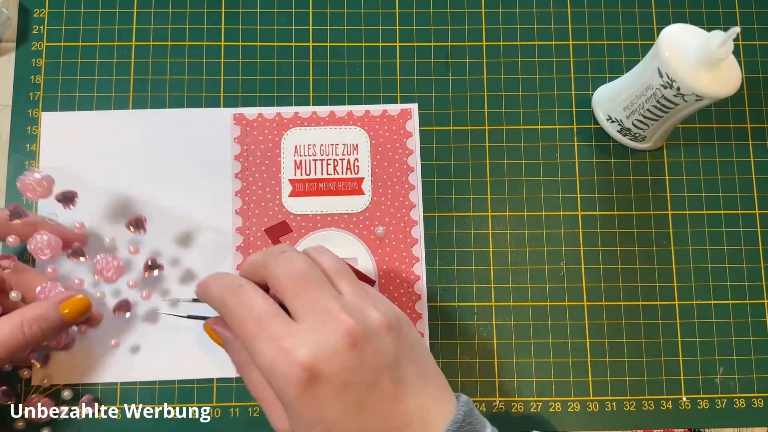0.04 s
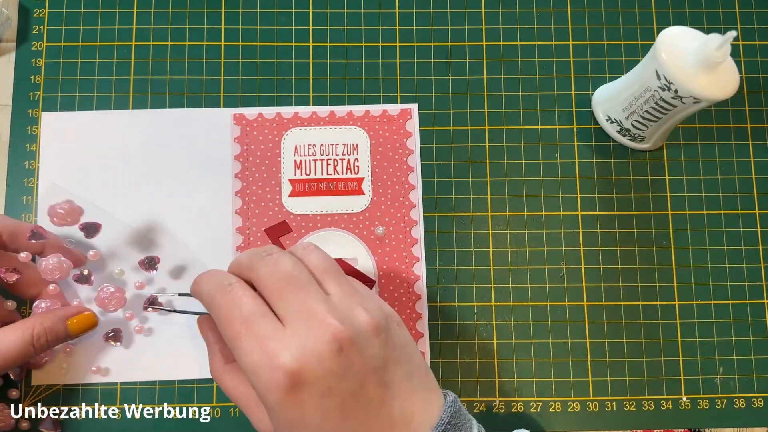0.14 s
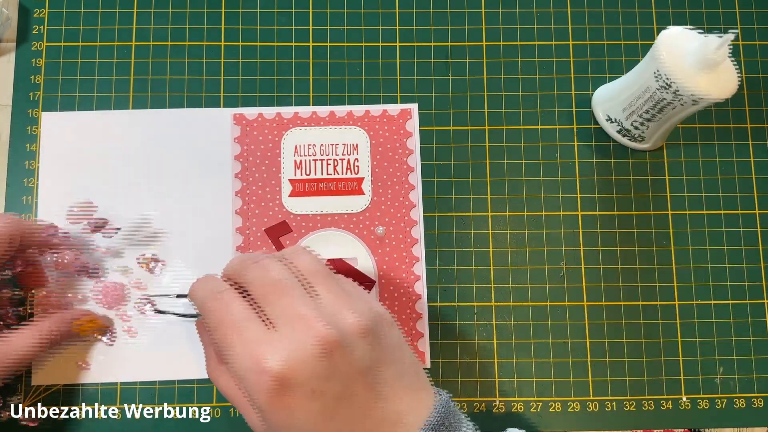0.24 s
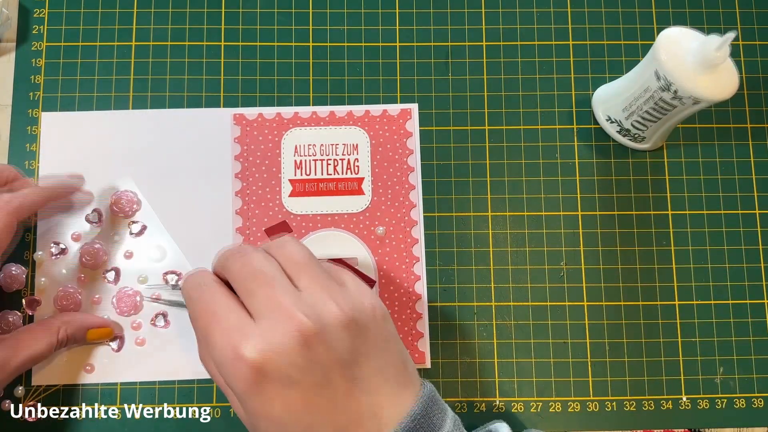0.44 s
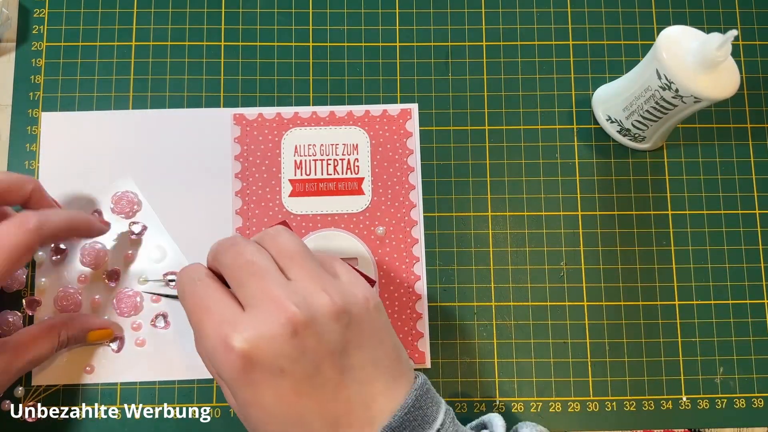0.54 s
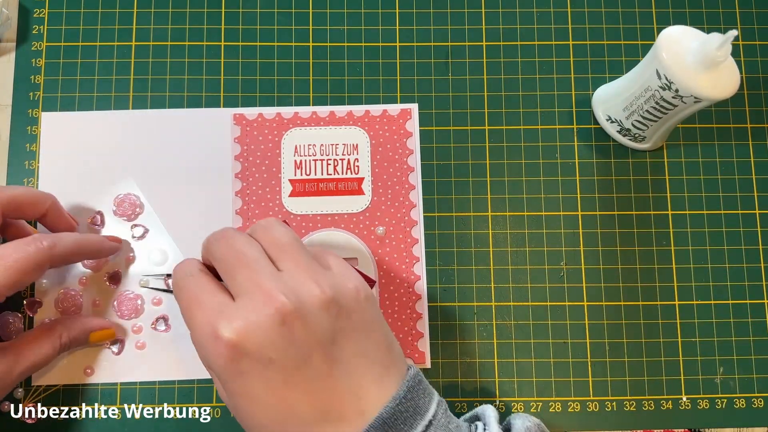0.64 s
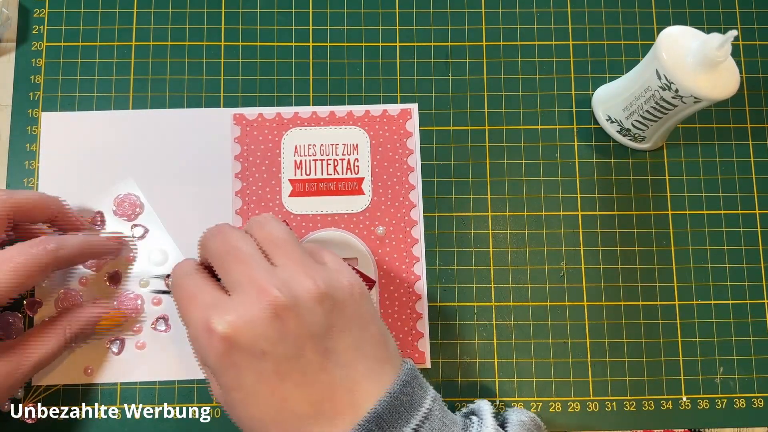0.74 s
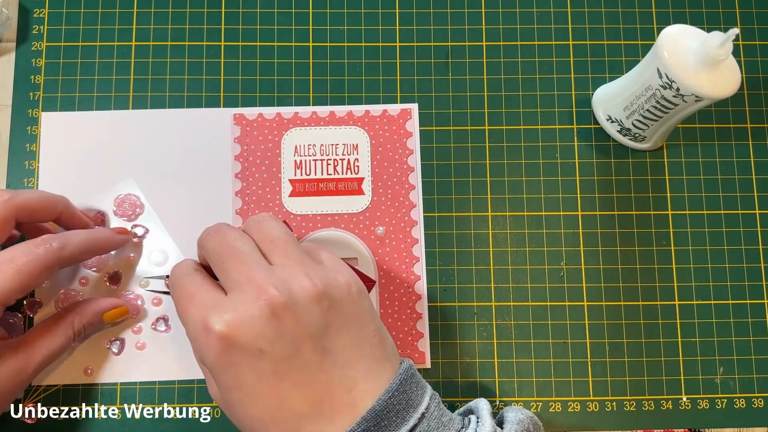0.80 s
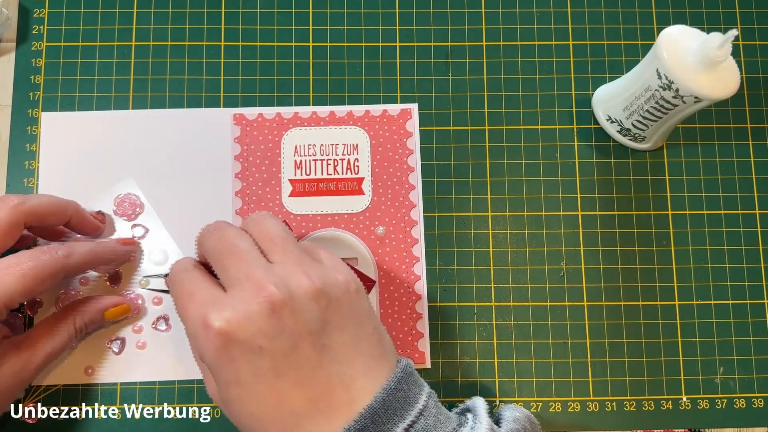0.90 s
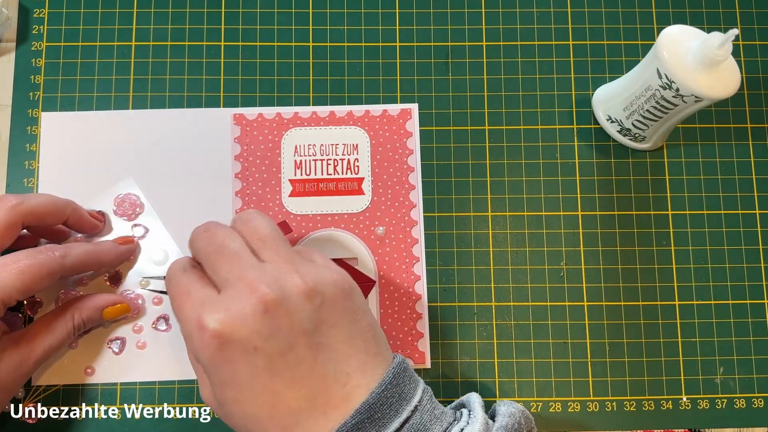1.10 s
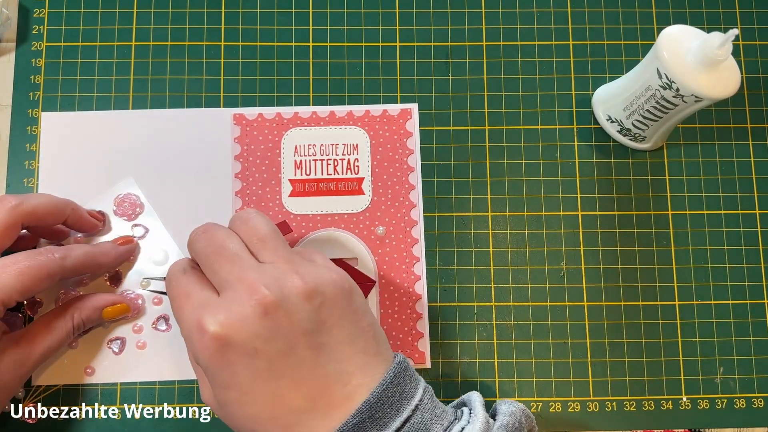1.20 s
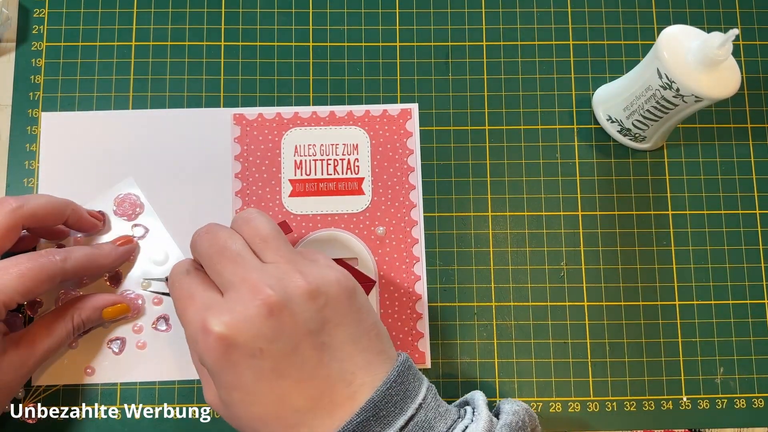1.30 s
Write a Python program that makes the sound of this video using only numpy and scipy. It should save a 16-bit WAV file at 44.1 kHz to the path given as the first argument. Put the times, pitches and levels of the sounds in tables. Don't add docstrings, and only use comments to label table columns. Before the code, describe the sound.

A stiff plastic sheet of stick-on gems rustles briefly, snaps with a hollow pop against a table, bounces, then crackles sharply as it is pressed flat; faint touches follow in a small quiet room, closely miked.

```python
import sys
import numpy as np
from scipy import signal
from scipy.fft import rfft, irfft, next_fast_len
from scipy.io import wavfile
from scipy.ndimage import map_coordinates

SR = 44100
rng = np.random.default_rng(int(sys.argv[2]) if len(sys.argv) > 2 else 0)


def persist_wave(psi):
    counts = np.round(np.clip(psi, -1, 1) * 32767).astype(np.int16)
    wavfile.write(sys.argv[1], SR, np.atleast_2d(counts).T)


def volts_from_decibels(level):
    exponent = np.asarray(level, float) / 20
    return 10 ** exponent


N = 59535
T = np.arange(N) / SR


def unit(x):
    return x / np.sqrt(np.mean(x ** 2) + 1e-20)


def along(points, hz):
    f, v = np.transpose(points)
    return np.interp(np.log(hz + 1), np.log(f + 1), v)


def filtered(x, response):
    m = next_fast_len(N + 8192)
    return irfft(rfft(x, m) * response(np.fft.rfftfreq(m, 1 / SR)), m)[..., :N]


def wobble(rate_hz):
    return map_coordinates(rng.standard_normal(int(N * rate_hz / SR) + 4), [T * rate_hz])


def noise(spectrum, grain_db=0):
    grain_level_db = grain_db * np.minimum(rng.exponential(size=N), 4)
    grains = rng.standard_normal(N) * volts_from_decibels(grain_level_db)
    return unit(filtered(grains, lambda hz: volts_from_decibels(along(spectrum, hz))))


def tone(hz):
    wander_rad = 0.55 * wobble(min(600, hz / 8))
    return np.sqrt(2) * np.sin(2 * np.pi * (hz * T + rng.random()) + wander_rad)


def bump(s, rise_s, fall_s):
    return np.exp(np.minimum((T - s) / abs(rise_s), (s - T) / abs(fall_s)))


def burst(shape, x):
    return shape * x * np.linalg.norm(shape) / np.linalg.norm(shape * x)


def rings(peaks):
    def response(f):
        total = 0
        for k, (hz, width_hz, db) in enumerate(peaks):
            damping = 1j * f * width_hz
            total = total + (-1) ** k * volts_from_decibels(db) * damping / (hz * hz - f * f + damping + 1e-9)
        return total
    return response


# (frequency [Hz], level [dB], lag [s])
BUCKLE_MODES = [(1160, -11.5, .002), (1542.8, 0.5, .001), (1880, 4.5, 0), (2250, -1, -.0017),
                (2919, -9.5, -.0005), (4100, -7.5, .0008), (5175, -9.5, -.001), (6210, -16, 0)]


def buckle():
    pop_s, swell_s, hold_s, stop_s = 0.2562, 0.0012, 0.0028, 0.0012
    modes = 0
    for hz, db, lag_s in BUCKLE_MODES:
        t = T - pop_s - lag_s
        shape = np.exp(np.minimum(0, np.minimum(t / swell_s, (hold_s - t) / stop_s)))
        modes = modes + volts_from_decibels(db - 3) * shape * tone(hz)
    crack = burst(bump(pop_s, 0.0009, 0.0025), noise(RUB_SPECTRUM, grain_db=5.0))
    return volts_from_decibels(-10.5) * modes + volts_from_decibels(-13) * crack


def patch_pop(s, db, hz, rise_s, fall_s, crack_db):
    shape = bump(s, rise_s, fall_s)
    crack = burst(shape, noise(RUB_SPECTRUM, grain_db=-0.5))
    return volts_from_decibels(db) * (shape * tone(hz) + volts_from_decibels(crack_db) * crack)


# (time [s], level [dB], pitch [Hz], rise [s], fall [s per 9 dB])
SNAPS = [(0.2354, -18.5, 3750, .0003, 0.0035), (0.2365, -18, 1600, .0005, 0.0024),
         (0.238, -20.5, 2600, .0006, 0.0018), (.24, -21.5, 2300, .0008, 0.0001),
         (.2385, -30, 4750, .001, 0.0077), (.245, -28, 2000, .001, -0.0009),
         (.249, -29, 1999, .0015, 0.0009), (.2635, -22, 2100, .001, -0.0008),
         (.268, -23.5, 1500, .002, 0.0057), (0.2722, -25, 2298, .001, -0.001),
         (.276, -26, 2399, .001, 0.001), (0.284, -27, 1890, .001, -0.0017),
         (.3026, -21, 3150, 0.00055, 0.0015), (0.3026, -23.5, 1644, .0006, .001),
         (.306, -24.5, 2182, .002, 0.0016), (0.3074, -23.5, 3111, .0008, .001),
         (.311, -26, 1950, .0015, 0.0027), (.319, -32.5, 3295, .002, 0.0005),
         (.397, -28.5, 1604, .001, 0.0035), (.424, -31, 2250, 0.0017, -0.0038),
         (.077, -26.5, 2200, .001, -0.0009), (.0778, -34.5, 3420, 0.00056, -0.0073),
         (.0765, -38.5, 1290, 0.0013, 0.0029)]


def snaps():
    return sum(patch_pop(*row, crack_db=-3.5) for row in SNAPS)


# (time [s], level [dB], pitch [Hz], broad crack [dB])
CLICKS = [(0.071, -33, 2189, -19), (0.16, -39.5, 2320, -17.5), (0.1721, -30, 5726, 2),
          (0.2328, -27.5, 5000, -3), (0.2344, -23, 6235, 3), (0.3011, -30.5, 6000, -0.5),
          (.374, -32.5, 6040, -0.5), (.3785, -40.5, 4500, -7), (0.3878, -36, 4500, -4),
          (.39, -34, 2821, -7), (.397, -30, 7470, 0.5), (0.4007, -22, 6800, 0), (0.4016, -16.5, 5784, -6),
          (0.4043, -15.5, 5037, -3.5), (0.4063, -14.5, 4416, -3.5), (.4067, -18, 1296, 0.5),
          (.408, -20, 5998, -4), (0.41, -16.5, 5004, -4), (0.4164, -31.5, 5488, -6),
          (.766, -61, 5590, -10.5), (.809, -52.5, 5460, -9)]


def clicks():
    rise_s, fall_s = 0.00033, 0.00077
    return sum(patch_pop(s, db, hz, rise_s, fall_s, crack_db) for s, db, hz, crack_db in CLICKS)


# (frequency [Hz], level [dB])
SHEET_MODES = [(1220, -4.5), (1570, -6.5), (2270, 0.5), (3180, -3), (4080, -1.5), (4430, -0.5),
               (5000, -2.5), (5660, 0), (6550, -5), (7070, -3.5)]
# (frequency [Hz], density [dB per Hz])
CRUNCH_SPECTRUM = [(180, -32), (400, -14), (900, -12), (2200, -7.5), (3500, -8), (5500, -3.5), (8000, -2),
                   (11000, -12), (16000, -12)]


def crunch():
    shape = bump(0.4052, 0.003, 0.0045)
    cracks = burst(shape, volts_from_decibels(8.3 * wobble(600)) * noise(CRUNCH_SPECTRUM, grain_db=4))
    modes = sum(volts_from_decibels(db + 2.5 * wobble(300)) * tone(hz) for hz, db in SHEET_MODES)
    return volts_from_decibels(-15.5) * cracks + volts_from_decibels(-23.5) * shape * modes


# (time [s], level [dB], frequency [Hz])
THUDS = [(.01, -38.5, 513.6), (.242, -38, 170.1), (.256, -25.5, 427.5), (.257, -31, 700),
         (0.26, -29.5, 320), (.261, -26.5, 235), (0.274, -30, 427.3), (0.279, -34.5, 139.4),
         (.285, -34.5, 700), (.313, -33, 170), (.316, -37.5, 426.5), (.403, -29, 858.3), (.404, -35.5, 500),
         (.408, -33, 328.7), (.412, -35, 140)]


def table():
    rise_s, fall_s = 0.0035, 0.007
    return sum(volts_from_decibels(db) * bump(s, rise_s, fall_s) * tone(hz) for s, db, hz in THUDS)


# (time [s], rubbing [dB], flexing [dB])
RUSTLE = [(0, -37, -37), (0.059, -45, -43.5), (0.129, -54.5, -54.5), (.165, -43.5, -46.5),
          (0.171, -32.5, -49), (.21, -32.5, -58.5), (0.229, -44, -43), (0.269, -33.5, -26),
          (.33, -43.5, -42.5), (.39, -48.5, -44.5), (.45, -51, -51), (0.558, -71, -64.5),
          (.72, -80.5, -67.5), (.85, -78.5, -72), (.95, -79, -81.5), (1.03, -85.5, -87),
          (1.35, -81.5, -73.5)]
# (frequency [Hz], density [dB per Hz])
RUB_SPECTRUM = [(180, -31.5), (400, -7.5), (900, -16), (2000, -5), (6000, -7.5), (8000, -8.5), (11000, -14),
                (16000, -19)]
# (frequency [Hz], width [Hz], level [dB])
FLEX_MODES = [(379.65, 97, -4.5), (526.1, 120, -3.5), (1040, 350, -2), (1933.4, 400, -1.5), (2462, 450, -3),
              (3400, 900, -11)]


def rustle():
    s, rub_db, flex_db = np.transpose(RUSTLE)
    rub = volts_from_decibels(np.interp(T, s, rub_db) + wobble(90)) * noise(RUB_SPECTRUM, grain_db=3.5)
    crackle = noise([(100, 0)], grain_db=2.5)
    flex = unit(filtered(crackle, rings(FLEX_MODES)))
    return rub + volts_from_decibels(np.interp(T, s, flex_db) + 3.6 * wobble(120)) * flex


# (time [s], level [dB], pitch [Hz], rise [s], fall [s])
TAPS = [
    (1.275, -59.5, 856.3, 0.0112, 0.0139),
    (.59, -61, 1880, 0.0311, 0.0303),
    (.7, -63.5, 1794, 0.0326, .015),
    (.8, -66, 2300, .02, .03),
    (.9, -65.5, 2000, 0.0302, 0.0202),
    (.96, -66.5, 2100, 0.0272, 0.0238),
    (1.07, -68, 2100, .015, 0.027),
    (1.27, -67, 2099, 0.0201, 0.021),
]


def taps():
    out = np.zeros(N)
    for s, db, hz, rise_s, fall_s in TAPS:
        patch = rings([(hz, hz / 4, 0)])
        brush = filtered(noise([(100, 0)], grain_db=3), lambda f: patch(f) ** 2)
        out = out + volts_from_decibels(db) * burst(bump(s, rise_s, fall_s), brush)
    return out


# (frequency [Hz], t60 [s])
ROOM_T60 = [(200, 0.16), (800, 0.24), (2000, 0.27), (5000, 0.21), (12000, 0.24)]
# (frequency [Hz], gain [dB])
ROOM_MID = [(200, 3), (2000, -1.5), (7000, -3), (10000, -15), (12000, -32), (15000, -18)]
# (frequency [Hz], gain [dB])
ROOM_SIDE = [(200, -14), (700, 9), (1800, -13), (3000, -1), (4500, -5), (8000, -6), (14000, -10.5)]


def room(x):
    build_s = 0.0078
    hz, t, z = signal.stft(rng.standard_normal((2, SR // 2)), SR, nperseg=256)
    decay = volts_from_decibels(-60 * t / along(ROOM_T60, hz)[:, None])
    tail = signal.istft(z * decay * (1 - np.exp(-t / build_s)), SR, nperseg=256)[1]
    pair = signal.fftconvolve(x[None], tail / np.linalg.norm(tail[0]), axes=1)[:, :N]
    mid, side = filtered(pair, lambda f: volts_from_decibels([along(ROOM_MID, f), along(ROOM_SIDE, f)]))
    return volts_from_decibels(-14.5) * np.array([mid + side, mid - side])


# (time [s], level [dB])
HUM_SWELL = [(0, -45.5), (.4, -43), (.512, -45), (.54, -43), (.644, -44.5), (.674, -52), (.73, -45.5),
             (.78, -52), (.88, -47.5), (.98, -43.5), (1.024, -53), (1.11, -50.5), (1.14, -43),
             (1.22, -49.5), (1.29, -44), (1.35, -48.5)]
# (frequency [Hz], density [dB per Hz])
HUM_SPECTRUM = [(15, -47), (25, -17.5), (54, -11.5), (189, -1), (260, -13), (321, -13), (379, -27.5),
                (418, -18), (700, -36.5), (910, -64), (1540, -120)]
# (frequency [Hz], density [dB per Hz])
HISS_SPECTRUM = [(290, -29), (500, -3), (950, -6.5), (1400, -15), (2000, -8.5), (2700, -13.5), (6500, -17),
                 (9000, -26.5), (12000, -41.5), (16000, -42.5)]
# (frequency [Hz], density [dB per Hz])
AIR_SIDE = [(180, -35.5), (300, -2), (565, -6.5), (856, -8), (1840, -30), (2650, -25.5), (16000, -33)]


def air():
    hum_db = np.interp(T, *np.transpose(HUM_SWELL)) + 1.0 * wobble(25)
    hiss_db = -66 + 0.87 * wobble(4.1)
    mid = volts_from_decibels(hum_db) * noise(HUM_SPECTRUM) + volts_from_decibels(hiss_db) * noise(HISS_SPECTRUM)
    side = volts_from_decibels(-64) * noise(HUM_SPECTRUM) + volts_from_decibels(-62) * noise(AIR_SIDE)
    balance = volts_from_decibels([[0.5], [-0.5]])
    return balance * np.array([mid + side, mid - side])


# (frequency [Hz], left lead [rad])
PORT_LEAD = [(0, 0), (250, .3), (450, .9), (700, .7), (1100, .15), (1800, .1), (3000, .5), (4800, .25),
             (7500, -1.5), (9000, -2.2), (11000, -2.85), (12800, -3.35), (14500, -4), (16200, -4.6)]
# (frequency [Hz], left over centre [dB])
HIT_LEAN = [(200, 0.18), (500, 2), (1000, -1.6), (9000, 0.5), (12000, 1.6), (15000, .5)]


def scene():
    def step(hz):
        return np.exp(0.5j * np.outer([1, -1], along(PORT_LEAD, hz)))

    def lean(hz):
        return step(hz) * volts_from_decibels(np.outer([1, -1], along(HIT_LEAN, hz)))

    hits = buckle() + snaps() + clicks() + crunch() + table() + taps()
    rub = rustle()
    return filtered(hits, lean) + filtered(rub, step) + room(rub + hits) + air()


def roll_off(x):
    return signal.sosfilt(signal.butter(12, 16640, fs=SR, output="sos"), x)


def record(dry):
    low_cut_hz, top_hz = 25, 15900

    def band(hz):
        return (hz < top_hz) * (1j * hz / (low_cut_hz + 1j * hz)) ** 2

    mix = np.clip(filtered(dry, band), -1, 1)
    return roll_off(mix)


dry = scene()
out = record(dry)
persist_wave(out)
```